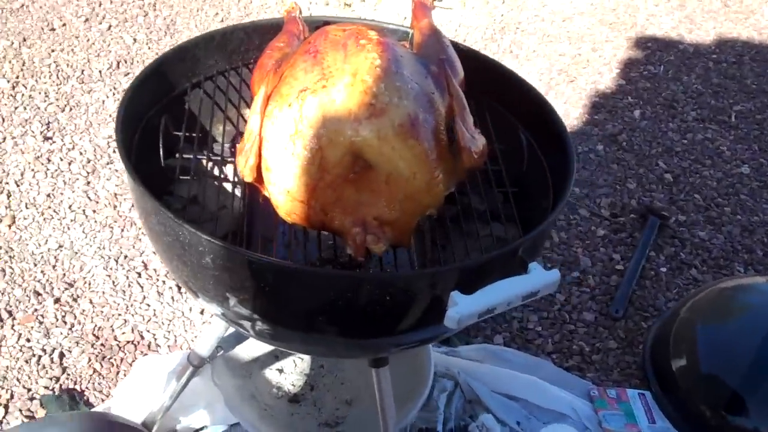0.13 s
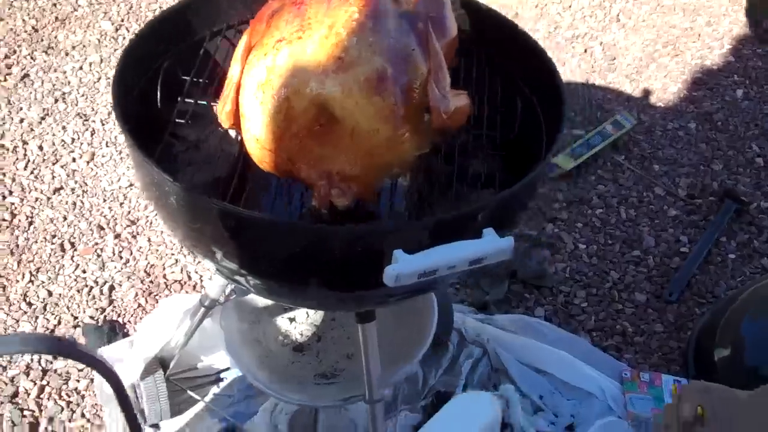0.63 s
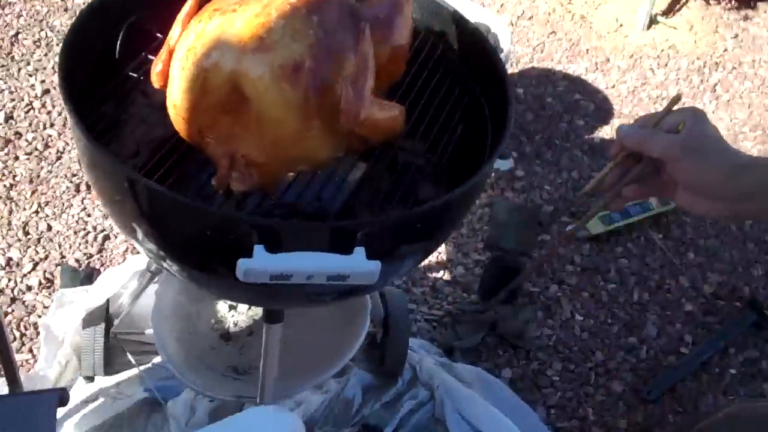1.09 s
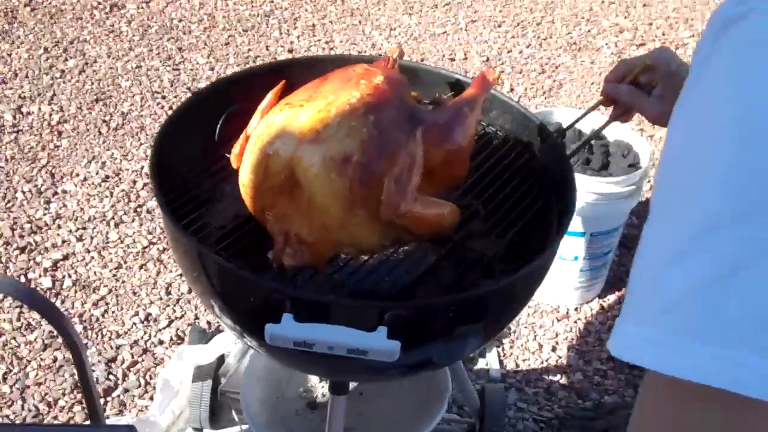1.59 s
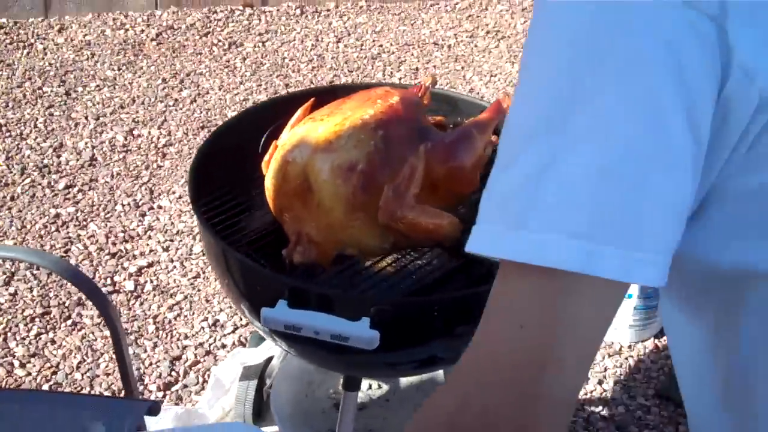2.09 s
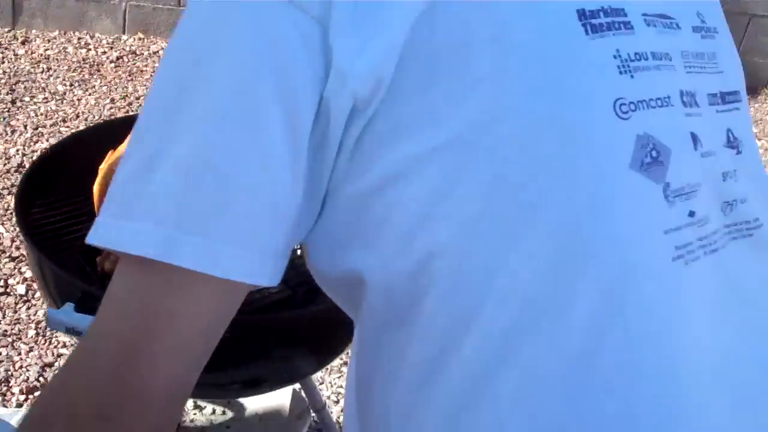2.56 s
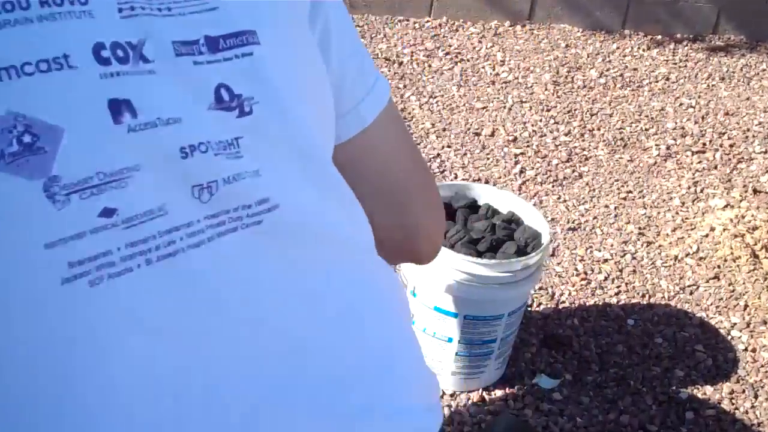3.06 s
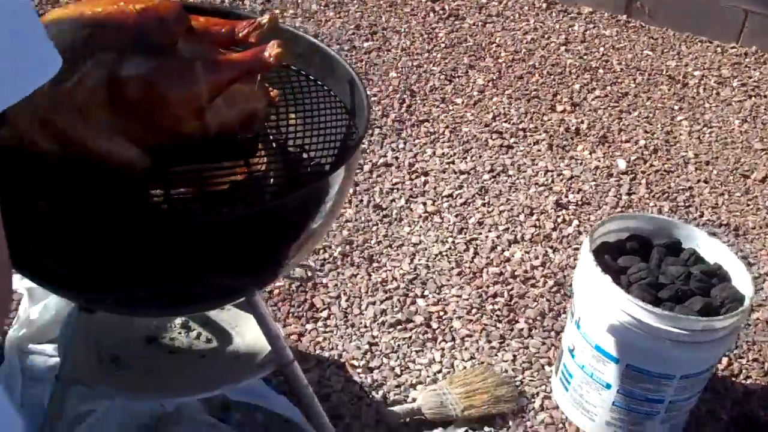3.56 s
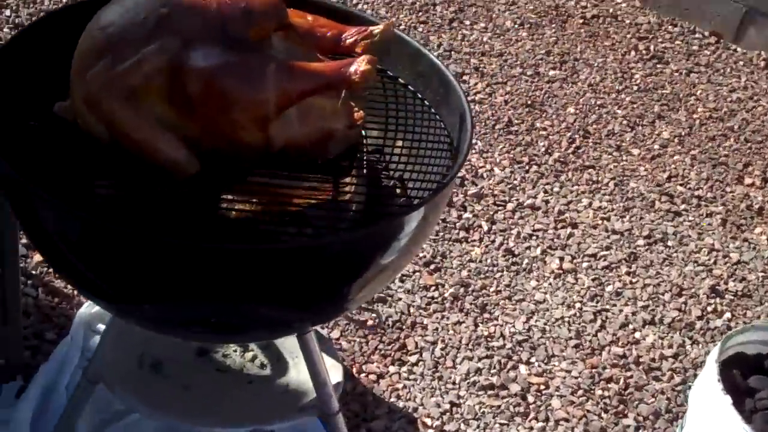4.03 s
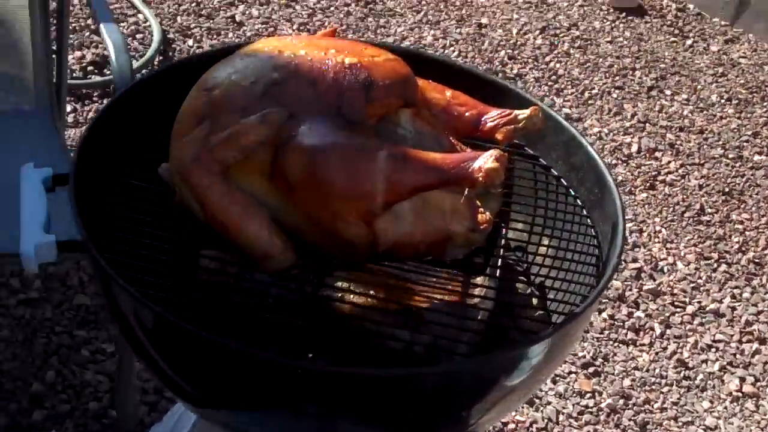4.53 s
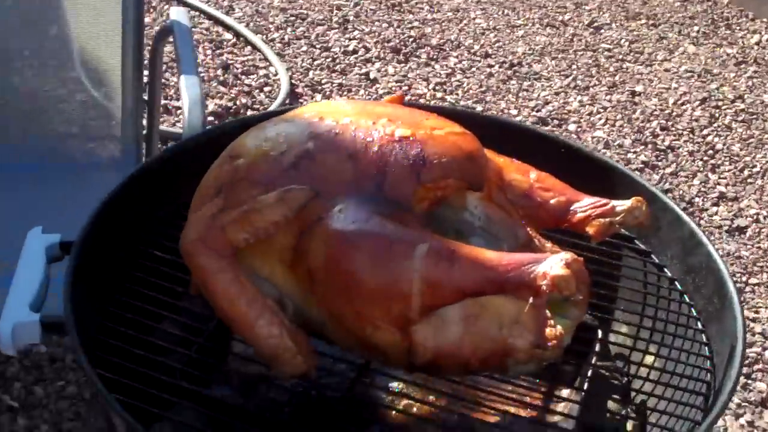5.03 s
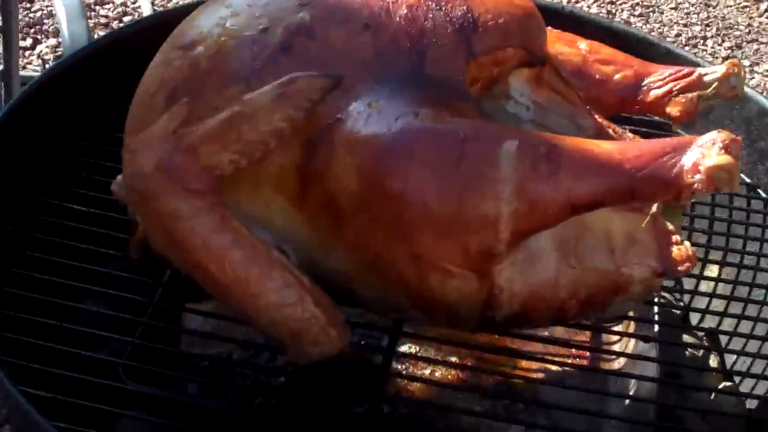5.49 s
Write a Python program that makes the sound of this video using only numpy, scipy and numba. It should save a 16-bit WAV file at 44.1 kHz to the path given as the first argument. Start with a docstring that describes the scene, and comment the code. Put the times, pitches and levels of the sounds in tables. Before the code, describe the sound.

Handheld stereo microphone outdoors, circling a grill. Continuous wet frying and steam hiss, dotted with small fat bursts and low plops; brief breeze buffeting in the first second and a half. Around the middle it becomes quiet and muffled, leaving a faint distant rumble. Then the sizzling surges back, brighter and nearer, with a hollow plop, crisp pops and ringing steel until it cuts off.

```python
"""A bird roasts over charcoal in an open kettle grill on gravel; a hand-held camera walks round it.
Fat boils from the start as damped bubble rings over steam hiss, with bursts, spits, plops and knocks; the bowl rings.
From about 0.35 to 1.5 s a breeze, low noise and single thumps, buffets the left microphone port hardest.
A passing body shades the treble from about 2.3 to 3.5 s; then the boil grows, and the bowl hums after 3.9 s.
Under it all lies a far backyard rumble of filtered noise."""
import sys
import numpy as np
from scipy import signal
from scipy.fft import rfft, irfft
from scipy.io import wavfile
from scipy.ndimage import uniform_filter1d
from numba import njit

SR = 44100
rng = np.random.default_rng(int(sys.argv[2]) if len(sys.argv) > 2 else 0)


def master(y):
    """Save y as 16-bit WAV."""
    cut = np.clip(np.atleast_2d(y).T, -1, 1)
    pcm = np.round(cut * 32767)  # scale
    wavfile.write(sys.argv[1], SR, pcm.astype(np.int16))


def convert_level_to_amplitude(level_db):
    """Map a level in decibels to its linear amplitude factor."""
    exponent = np.asarray(level_db, float) / 20
    return 10 ** exponent


N = 248283  # samples


def level(x, db):
    """Scale to an rms level."""
    return x * convert_level_to_amplitude(db) / np.sqrt(np.mean(x ** 2))


def colour(x, points):
    """Weight the spectrum by (f/Hz, level/dB) points joined on a log-frequency axis."""
    hz, db = np.transpose(points)
    axis = np.log(np.arange(1, N // 2 + 2) * SR / N)
    return irfft(rfft(x) * convert_level_to_amplitude(np.interp(axis, np.log(hz), db)), N)


def wide_noise(side_points):
    """Stereo noise: a shared middle plus a coloured side of opposite sign in the two ports."""
    mid, side = rng.standard_normal((2, N))
    return mid + colour(side, side_points) * np.array([[1], [-1]])


def ring(x, hz, width):
    """One resonance, gain 1 at its centre."""
    return signal.lfilter(*signal.iirpeak(hz, hz / width, SR), x)


@njit
def sweep(x, hz, width):
    """State-variable band-pass whose centre moves."""
    y, band, low = np.empty(len(x)), 0., 0.
    for i in range(len(x)):
        g, damping = np.tan(np.pi * hz[i] / SR), width / hz[i]
        v = (band + g * (x[i] - low)) / (1 + g * (g + damping))
        band, low, y[i] = 2 * v - band, low + 2 * g * v, damping * v
    return y


def walk(rate):
    """Random levels held 1 / rate s and slewed twice."""
    hold = int(SR / rate)
    steps = np.repeat(rng.standard_normal(N // hold + 1), hold)
    slewed = uniform_filter1d(uniform_filter1d(steps, hold), hold)
    return 0.42 * slewed[:N]


def follow(table):
    """Turn a t/s table into one control per further column, straight lines between its rows."""
    s, *columns = np.transpose(table)
    return [np.interp(np.arange(N) / SR, s, column) for column in columns]


@njit
def bubbles(s, hz, cycles, size, lag, glide):
    """Damped rings that swell for a moment and glide up; the right port's phase lags by lag samples."""
    out = np.zeros((2, N))
    for e in range(len(s)):
        turn = 2j * np.pi * hz[e] / SR
        fade = np.exp(-hz[e] / SR / cycles[e])
        step = np.exp(turn) * fade
        bend = np.exp(turn * glide * hz[e] / SR / cycles[e])
        z, late = size[e] + 0j, np.exp(-turn * lag[e])
        rise, start = 1., int(s[e] * SR)
        for i in range(start, min(N, start + int(6 * cycles[e] * SR / hz[e]))):
            out[0, i] += (1 - rise) * z.imag
            out[1, i] += (1 - rise) * (z * late).imag
            z, step, rise = z * step, step * bend, rise * fade ** 4
    return out


# modes of the steel bowl, lowest first: f/Hz, width/Hz, level/dB
BOWL_MODES = [(526.4, 28, 5.5), (805, 29, 0.5), (1020, 24, 5), (1204, 28, 4.5), (1580, 18, 2),
              (2080, 70, -2.5), (6360, 26, 4), (6960, 17, 0)]


def upper_bowl(x):
    """The bowl modes above the lowest ring along with whatever strikes the steel."""
    return sum(convert_level_to_amplitude(db) * ring(x, hz, width) for hz, width, db in BOWL_MODES[1:])


def lowest_bowl(x):
    """The lowest bowl mode alone, gain 1 at its centre."""
    hz, width, _ = BOWL_MODES[0]
    return ring(x, hz, width)


# spectral tilt of the yard: f/Hz, level/dB
YARD_COLOUR = [(15, -35), (25, 15), (436, 7.5), (781, 7), (940, -10), (1190, 2), (1640, -1), (5260, -20.5),
               (9660, -37), (14000, -47)]
# slow swell of the yard: t/s, level/dB
YARD_SWELL_LEVEL = [(0.0, -54.5), (1.08, -42.5), (1.4, -55.5), (2.3, -53.5), (2.85, -48), (4.2, -47),
                    (4.6, -55), (5.63, -59)]


def yard():
    """Far backyard rumble of traffic and air, as coloured noise wide in the treble."""
    swell_db, = follow(YARD_SWELL_LEVEL)
    wide = wide_noise([(40, -2), (120, -29), (8000, 28.0)])
    return convert_level_to_amplitude(swell_db) * level(colour(wide, YARD_COLOUR), 0.7)


# gust strength before the port offsets: t/s, level/dB
GUSTS = [(0.0, -63), (0.3, -62), (0.36, -51), (0.58, -55), (0.64, -32.5), (0.7, -57), (0.79, -46),
         (0.86, -48), (0.95, -54), (1.07, -43), (1.13, -44.5), (1.21, -40.5), (1.26, -45), (1.3, -62),
         (1.4, -56), (1.5, -42), (1.56, -62.5), (1.75, -56), (2.0, -60), (2.3, -64), (4.6, -68),
         (4.95, -59.5), (5.25, -59.5), (5.63, -61)]
# single eddies thumping on the left port: t/s, level/dB, f/Hz
EDDY_THUMPS = [(0.352, -34, 70), (0.545, -32, 80), (0.627, -19, 87), (0.774, -32, 90), (0.823, -24.5, 108),
               (0.954, -32, 70.5), (1.059, -41, 80), (0.875, -29, 39.8), (1.185, -36, 80), (1.418, -31, 60),
               (1.485, -33, 70)]
# spectral tilt of the buffeting: f/Hz, level/dB
BUFFET_COLOUR = [(20, -11), (40, 6), (80, 0.5), (160, -7), (320, -13.5), (600, -58)]


def breeze():
    """Eddies hit the two ports unrelated, the left harder; the strongest land as single thumps."""
    gust_db, = follow(GUSTS)
    eddies = []
    for port_db in (6, -5):  # left, right
        noise = colour(rng.standard_normal(N), BUFFET_COLOUR)
        eddies.append(level(noise * convert_level_to_amplitude(3 * walk(30)), port_db))
    after_last = np.arange(N) / SR > GUSTS[-1][0]
    gust_db = np.where(after_last, -75, gust_db)
    s, thump_db, hz = np.transpose(EDDY_THUMPS)
    thumps = bubbles(s, hz, 1.5 + 0 * s, convert_level_to_amplitude(thump_db), 0 * s, 0.0)[0]
    return convert_level_to_amplitude(gust_db) * np.array(eddies) + thumps * convert_level_to_amplitude(np.array([[0], [-12]]))


# plops and knocks, mostly low, one a short higher click: t/s, level/dB, f/Hz
PLOPS_AND_KNOCKS = [(0.004, -35.5, 250), (0.028, -35, 230), (0.056, -32, 290), (0.414, -29.5, 297),
                    (0.436, -35, 334), (0.503, -31.5, 294), (0.514, -28.5, 249), (0.546, -36, 237),
                    (1.101, -30, 634), (2.568, -38, 627), (2.818, -32.5, 276), (3.177, -33.5, 500),
                    (3.289, -35.5, 1570), (3.73, -38, 620), (3.811, -31.5, 325), (3.887, -34, 590),
                    (3.944, -28, 594), (4.053, -29, 287), (4.104, -30.5, 530), (4.532, -30, 483),
                    (4.66, -18, 220), (4.707, -29, 480), (4.748, -25, 558), (4.893, -29.5, 534),
                    (5.2, -35.5, 487), (5.496, -36.5, 493)]


def plops_and_knocks():
    """A short ring, a duller thud under it and a broad splash on top, which set pan and bowl going."""
    splash_db, splash_db_per_octave, splash_decay_s = 1, 4, 0.009  # the deeper ones splash less
    s, db, hz = np.transpose(PLOPS_AND_KNOCKS)
    tone = bubbles(s, hz, 2.35 + 0 * s, convert_level_to_amplitude(db), 0 * s, 0.083)
    thud = bubbles(s + 0.0022, 0.66 * hz, 1.44 + 0 * s, convert_level_to_amplitude(db - 2.0), 0 * s, 0.065)
    tone = colour(tone + thud, [(50, -25), (120, 0)])
    hits = np.zeros(N)
    hits[(s * SR).astype(int)] = convert_level_to_amplitude(db + splash_db + splash_db_per_octave * np.log2(hz / 500))
    decay = signal.lfilter([1], [1, -np.exp(-1 / (splash_decay_s * SR))], hits)
    splash = colour(decay * rng.standard_normal(N), [(300, 3.5), (900, 2.5), (3000, 0.5), (6000, -21)])
    splash = splash + convert_level_to_amplitude(7) * upper_bowl(splash)
    pan = convert_level_to_amplitude(2.5) * ring(tone, 222.8, 3.1)
    return tone + splash + pan + convert_level_to_amplitude(16.5) * lowest_bowl(tone)


# sharp spits: t/s, level/dB, left minus right level/dB, scatter over the crack level/dB
SPIT_CRACKS = [(0.8135, -33, 3, -3.5), (0.8167, -23, 6, -3), (0.883, -12.5, 14, -19), (1.472, -26, 2, -2),
               (1.7215, -32, 11, -20), (1.875, -21, 1, -15), (2.151, -34, 12, -9), (2.164, -33, 3, -11),
               (2.356, -26.5, 1, -7), (2.7306, -42, 6, -14), (2.7552, -23.5, -2, -9.5), (3.049, -34, 3, -8),
               (3.1573, -34.5, 3, -4.5), (3.2902, -31, 4, -22), (3.387, -39, -0.5, -8), (3.885, -32, 4, -4),
               (3.95, -23, 1, -14), (4.204, -20, 5, -6), (4.408, -23, 3, -4), (4.656, -18, 2.5, -10),
               (4.98, -15, 3, -12), (5.14, -25.5, 11, -4.5), (5.24, -30, 11, -17), (5.311, -12.5, 3, -11),
               (5.3776, -22, 3, -20), (5.446, -21, 3, -8), (5.48, -21, 5, -24)]


def spits():
    """A coloured click, then a few milliseconds of noise as scatter off grate and bowl."""
    s, db, pan_db, scatter_db = np.transpose(SPIT_CRACKS)
    at = (s * SR).astype(int)
    crack, scatter = np.zeros((2, 2, N))
    crack[:, at] = convert_level_to_amplitude(db + np.array([pan_db, -pan_db]) / 2)
    scatter[:, at] = crack[:, at] * convert_level_to_amplitude(scatter_db)
    tail = rng.standard_normal((2, 600)) * np.exp(-np.arange(600) / SR / 0.0044)
    scatter = signal.fftconvolve(scatter, tail, axes=1)[:, :N]
    both = colour(crack, [(1500, 6.5), (6000, -10), (12000, 5.5)]) + scatter
    return colour(both, [(1200, -10), (4000, 13.0), (8000, 12.0), (12000, -5.5), (15000, -12)])


# bursts of fat, some heard mainly as short rings of the bowl: t/s, level/dB, f/Hz
FAT_BURSTS = [(0.033, -26, 1300), (0.033, -20.5, 2550), (0.125, -20.5, 2080), (0.1685, -20.5, 2500),
              (0.195, -30, 1140), (0.3217, -20, 4800), (0.342, -24, 2640), (0.5806, -20.5, 2680),
              (0.662, -20, 2010), (0.678, -28, 1260), (0.702, -25, 1290), (0.727, -30, 1330),
              (0.753, -22.5, 1240), (0.762, -25.5, 1180), (0.78, -31, 1360), (0.8185, -22.5, 2910),
              (0.875, -22.5, 770), (0.891, -25, 1130), (0.9637, -26, 3200), (0.966, -25.5, 1300),
              (0.987, -19.5, 1240), (0.996, -36, 1150), (1.083, -20, 2780), (1.1054, -24, 2780),
              (1.118, -24, 1080), (1.16, -19.5, 3300), (1.179, -25.5, 1690), (1.203, -26, 1200),
              (1.305, -27, 2950), (1.321, -20, 2940), (1.3612, -24.5, 2730), (1.381, -22, 3160),
              (1.4267, -19, 2620), (1.453, -34, 2600), (1.47, -23, 3200), (1.5095, -21, 2600),
              (1.532, -23, 2700), (1.543, -22.5, 3780), (1.568, -23.5, 2710), (1.571, -24, 6200),
              (1.585, -23, 3170), (1.595, -26, 3500), (1.6186, -33, 2400), (1.7034, -26, 2530),
              (1.6442, -17.5, 2630), (1.643, -23.5, 4370), (1.721, -21.5, 2620), (1.7764, -19.5, 2970),
              (1.7992, -24.5, 4070), (1.8142, -23.5, 2630), (1.858, -21, 2700), (1.875, -21, 3200),
              (1.9104, -23, 3670), (1.9324, -25, 2510), (1.9583, -27, 3850), (2.0207, -22, 3160),
              (2.032, -29, 3500), (2.05, -26, 3320), (2.065, -23, 4100), (2.088, -28, 2700),
              (2.1185, -20, 3450), (2.074, -38, 10400), (2.104, -34, 10000), (2.148, -26, 2720),
              (2.164, -24, 9900), (2.165, -28, 12400), (2.175, -28, 3300), (2.308, -26.5, 1300),
              (2.354, -26.5, 2670), (2.405, -26, 2000), (2.4463, -27, 3400), (2.47, -30.5, 1300),
              (2.4977, -27.5, 2640), (2.5267, -27, 2880), (2.558, -28.5, 1300), (2.6064, -27, 2620),
              (2.62, -35, 2300), (2.636, -29, 2430), (2.6638, -30, 2290), (2.6892, -26.5, 3100),
              (2.732, -30.5, 1200), (2.785, -28, 850), (2.807, -22, 1190), (2.8185, -22.5, 3070),
              (2.819, -26.5, 786), (2.842, -29, 2920), (2.871, -30, 830), (2.8883, -31, 2620),
              (3.108, -35, 1230), (3.128, -34, 1230), (3.1432, -37, 1580), (3.152, -35, 1230),
              (3.2, -31.5, 1230), (3.178, -27, 1210), (3.2405, -30, 1880), (3.2619, -28.5, 3060),
              (3.3103, -31, 3750), (3.3772, -28, 3000), (3.4585, -33, 2920), (3.478, -26, 3200),
              (3.55, -19.5, 2920), (3.566, -27, 2980), (3.588, -21, 2920), (3.62, -22, 3100),
              (3.647, -23, 3020), (3.677, -26, 3470), (3.696, -20.5, 1540), (3.735, -21, 900),
              (3.764, -17.5, 3530), (3.768, -20, 1980), (3.797, -26, 3020), (3.81, -29, 3100),
              (3.825, -30, 3000), (3.843, -25, 3150), (3.868, -19, 2980), (3.9, -29, 3120),
              (3.929, -16.5, 5000), (3.962, -30, 3000), (4.047, -17.5, 3120), (4.093, -24.5, 2900),
              (3.9195, -25, 4750), (3.949, -15, 4950), (4.027, -20.5, 3130), (4.182, -33, 3100),
              (4.341, -19.5, 3400), (4.384, -21, 1500), (4.405, -20, 2970), (4.5256, -15.5, 3530),
              (4.601, -16.5, 1630), (4.6204, -18.5, 3770), (4.6605, -14.5, 2820), (4.675, -17, 2720),
              (4.69, -17, 2900), (4.662, -34, 1100), (4.69, -20.5, 800), (4.737, -20, 1020),
              (4.76, -23.5, 1020), (4.838, -25, 1020), (4.668, -25, 2070), (4.706, -18, 1020),
              (4.719, -17, 2630), (4.749, -16, 3170), (4.808, -21, 5600), (4.833, -16, 2530),
              (4.896, -28, 1040), (4.9477, -17, 5300), (4.968, -19.5, 2710), (5.0, -19.5, 2860),
              (5.024, -29.5, 2700), (5.027, -14.5, 4720), (5.042, -19, 1045), (5.055, -16.5, 2530),
              (5.065, -29, 6450), (5.101, -18, 2700), (5.146, -20.5, 1040), (5.15, -19, 2500),
              (5.156, -17, 4200), (5.17, -16.5, 5200), (5.17, -30, 2630), (5.197, -26, 1200),
              (5.212, -18, 1120), (5.258, -16.5, 5100), (5.334, -20, 2700), (5.241, -21, 4760),
              (5.3073, -17, 2640), (5.3777, -18, 5130), (5.402, -17.5, 2680), (5.4465, -15.5, 3040),
              (5.477, -15, 2700), (5.523, -14, 4450), (5.547, -16, 2700), (5.495, -17.5, 1100),
              (5.504, -19, 4720), (5.5687, -32, 2740)]


def bursts(sizzle_db, low_hz, high_hz):
    """Each burst is a soft, fading knot of rings round one pitch; small ones fall in the focused bands."""
    small_count, small_db, scatter_db, ring_s = 500, -4, 6, .0011  # small_db is over the sizzle
    when, size, kind = rng.random((small_count, 3)).T
    at = (when * N).astype(int)
    chance_db = sizzle_db[at] + small_db + scatter_db * (size - .5)
    small = np.c_[at / SR, chance_db, np.where(kind < .7, low_hz[at], high_hz[at])]
    s, db, hz = np.repeat(np.r_[FAT_BURSTS, small], 30, axis=0).T
    jitter, detune, place = rng.random((len(s), 3)).T
    after = (np.arange(len(s)) % 30 + jitter) / 30  # the rings follow one another through the burst
    spread = convert_level_to_amplitude(120 * (detune - .5) ** 5 + 1.3 * (detune - .5))  # most near the pitch, a few far off
    start_s = .009 * after ** 1.3 - .001
    fade_db = 2 + 13 * abs(after - .15)
    lag = 1 + 2.5 * (place - .5)
    knots = bubbles(s + start_s, hz * spread, hz * ring_s, convert_level_to_amplitude(db - fade_db), lag, 0.017)
    knots = knots + convert_level_to_amplitude(-3) * upper_bowl(knots)
    return colour(knots, [(350, -30), (700, 0)])


def boil(flutter_db):
    """Bubbles of every size ring at their own pitch, each size spurting in its own time."""
    when, pitch, place, length, luck = rng.random((30000, 5)).T
    at = (when * N).astype(int)
    own = np.array([walk(30) for _ in range(8)])[(pitch * 8).astype(int), at]
    spurt_db = 4.0 * own + flutter_db[at]
    hz = 400 * (14000 / 400) ** pitch
    size_db = np.minimum(spurt_db - 2.2 * np.log(luck), 14)  # surface tension limits the largest
    lag = 1.27 + 2.0 * (place - .5)
    return bubbles(when * N / SR, hz, 3.63 + 6.15 * length, convert_level_to_amplitude(size_db) * hz / SR, lag, 0.029)


def droplet_ticks():
    """Tiny droplets crack in about a single cycle."""
    when, luck, pitch, place = rng.random((7000, 4)).T
    size_db = np.minimum(-3.5 * np.log(luck), 14)
    hz, lag = 1200 + 8000 * pitch ** 2, 0.096 + 0.33 * (place - .5)
    return bubbles(when * N / SR, hz, 0.97 + 0 * when, convert_level_to_amplitude(size_db), lag, 0.0043)


def steam(flutter_db):
    """Steam hiss: wide noise that follows the bubbles' flutter a little."""
    hiss = wide_noise([(500, -17), (3000, -45), (12000, -32.0)])
    return convert_level_to_amplitude(0.32 * flutter_db) * colour(hiss, [(6000, -10.0), (13000, -19.0)])


# spectral tilt of the boiling fat: f/Hz, level/dB
FAT_COLOUR = [(88, -7), (150, -5.5), (228, -0.5), (376, -4.5), (520, -8), (693, -2), (1020, 0),
              (1840, -6.5), (2690, -0.5), (4350, -0.5), (5060, -0.5), (7000, -8), (9700, -13),
              (12000, -20.5), (14500, -29.5)]
# lowest bowl mode kept ringing by the fat: t/s, level/dB
BOWL_HUM_LEVEL = [(0.0, -52.5), (1.05, -58.5), (1.3, -64), (2.6, -61.5), (3.5, -61.5), (3.93, -45.5),
                  (4.74, -44.5), (4.9, -50), (5.63, -47.5)]


def sizzle(sizzle_db, treble_db, body_db, low_hz, high_hz, view_db):
    """Bubbles, droplet cracks and steam hiss boil together; the bowl rings with them."""
    surge_db, surges_per_s = 1.5, 25  # the boiling surges and slackens by chance
    body_surge_db, body_surges_per_s = 2.5, 30.0  # the larger bubbles come in flurries of their own
    flutter_db = 1.5 * walk(60) + 6.5 * walk(200)  # quick, shared by all bubble sizes
    raw = level(boil(flutter_db), 0) + level(droplet_ticks(), -5) + level(steam(flutter_db), -8)
    fat = colour(raw, FAT_COLOUR)
    fat = fat + convert_level_to_amplitude(1.34 * view_db) * upper_bowl(fat)
    focus = np.array([convert_level_to_amplitude(5) * sweep(port, low_hz, 240.0) + convert_level_to_amplitude(3) * sweep(port, high_hz, 280.0)
                      for port in fat])
    body = colour(fat, [(1400, 0.0), (2100, -72)])
    treble = colour(fat, [(4800, -18.5), (7000, -3.0)])
    middle = level(fat - body - treble + convert_level_to_amplitude(1.7 * view_db) * focus, 0)
    treble = convert_level_to_amplitude(treble_db) * level(treble, 0.052)
    body = convert_level_to_amplitude(body_db + body_surge_db * walk(body_surges_per_s)) * level(body, -2.5)
    hum_db, = follow(BOWL_HUM_LEVEL)
    hum = convert_level_to_amplitude(hum_db) * level(lowest_bowl(raw), 0)
    return convert_level_to_amplitude(sizzle_db + surge_db * walk(surges_per_s)) * (middle + treble + body) + hum


# boiling fat: t/s, sizzle level/dB, treble over it level/dB, low body over it level/dB (before trims)
FAT_BOIL = [(0, -34.5, -6.5, 1), (.09, -36.5, -6.5, -7.5), (.16, -34, -9, -3), (.62, -34.5, -8, -6),
            (.72, -32, -7.5, -6.5), (.82, -35.5, -2, -7.5), (1.12, -35, -7, -5), (1.27, -36.5, -10.5, -7.5),
            (1.6, -36, -9.5, -5.5), (1.95, -36, -8.5, -6), (2.15, -35, -7.5, -10.5), (2.3, -39, -6.5, -5.5),
            (2.55, -43, -13, -3), (2.75, -37.5, -17, -9.5), (2.86, -41, -12, -2.5), (2.95, -43.5, -16, 1.5),
            (3.15, -43, -17, -1), (3.25, -44.5, -29, 7.5), (3.29, -42, -22, -1.5), (3.38, -39, -13, -1.5),
            (3.44, -40.5, -25, -3), (3.48, -37.5, -23, -2), (3.57, -33, -12.5, -5), (3.8, -30.5, -10, -6),
            (4.03, -32, -5.5, -12), (4.3, -31.5, -5, -10.5), (4.62, -29, -4, -7.5), (4.67, -25, -5, -6.5),
            (4.76, -28, -7.5, -6.5), (4.81, -29, -1, -9.5), (5.2, -32, 2.5, -14.5),
            (5.63, -27.5, -3.5, -10)]
# two bands the bowl focuses, shifting as the camera moves round it:
# t/s, lower f/Hz, upper f/Hz, view into the bowl level/dB (scaled where used)
BOWL_FOCUS = [(0.0, 2940, 5100, -23), (1.1, 2880, 5530, -5.5), (1.4, 2600, 4180, -4), (1.9, 2620, 3950, -5),
              (2.15, 2730, 3880, -9), (2.6, 2470, 5070, -1), (2.9, 2550, 5500, -6), (3.4, 2880, 5000, -8),
              (3.55, 3000, 4670, -3), (3.95, 3180, 4870, -2), (4.3, 3040, 5250, 0),
              (4.83, 2730, 5260, -6.5), (5.2, 2670, 4970, 0), (5.63, 2710, 4850, -4)]


def boiling_fat():
    """One boil drives both the sizzle and the small bursts, through the bands the bowl focuses."""
    sizzle_db, treble_db, body_db = follow(FAT_BOIL)
    low_hz, high_hz, view_db = follow(BOWL_FOCUS)
    boiling = sizzle(sizzle_db, treble_db, body_db, low_hz, high_hz, view_db)
    return boiling + bursts(sizzle_db, low_hz, high_hz)


# left over right port: f/Hz, level/dB
PORT_BALANCE = [(60, 0), (110, -2), (200, 3.5), (370, 3), (680, 3.5), (1250, 3.5), (2290, 3.5), (4200, 4),
                (7700, 1), (14100, 4.5)]


def balance(x):
    """Lean the stereo image by frequency, half the difference on each port."""
    hz, db = np.transpose(PORT_BALANCE)
    return np.array([colour(x[0], np.c_[hz, db / 2]), colour(x[1], np.c_[hz, -db / 2])])


def scene():
    """Yard, breeze and grill."""
    return balance(yard() + plops_and_knocks() + boiling_fat()) + spits() + breeze()


def low_pass(x):
    """Removes everything above the highest recorded frequency."""
    return signal.sosfilt(signal.butter(12, 14720, fs=SR, output="sos"), x)


def record(dry):
    """Each microphone adds its own faint hiss and rolls off at the top."""
    hiss = colour(rng.standard_normal((2, N)), [(3000, -16), (9000, -4.5), (13000, -18)])
    mix = colour(dry + level(hiss, -52.5), [(14100, -2.0), (15200, -27)])
    return low_pass(mix)


dry = scene()
out = record(dry)
master(out)
```